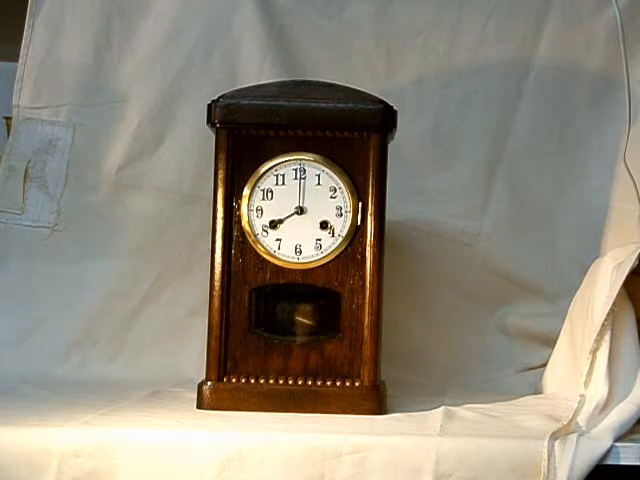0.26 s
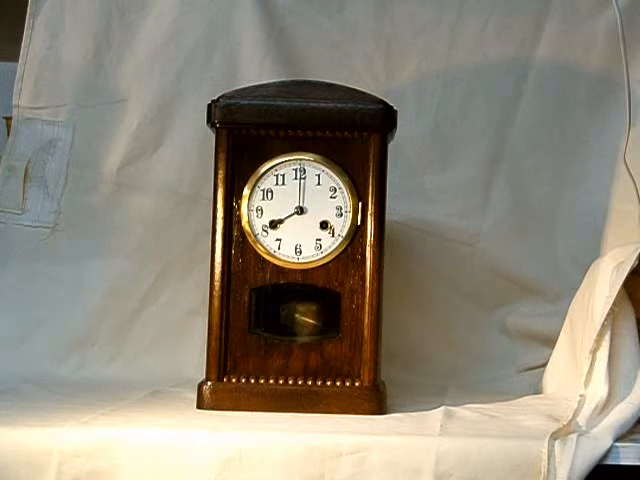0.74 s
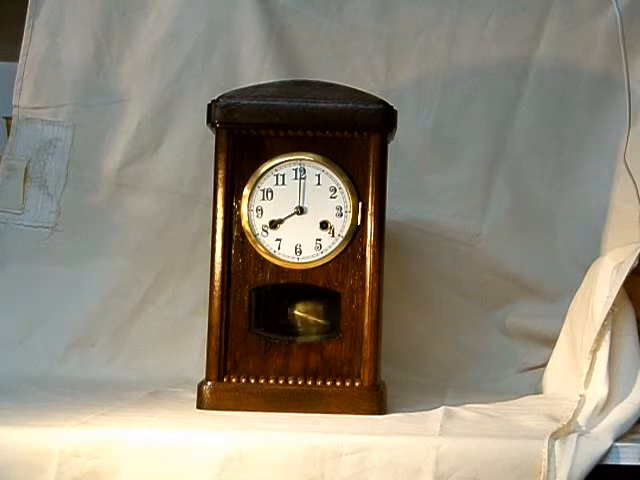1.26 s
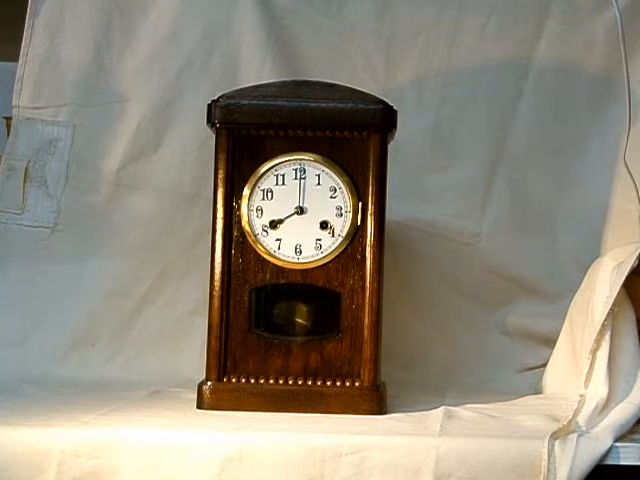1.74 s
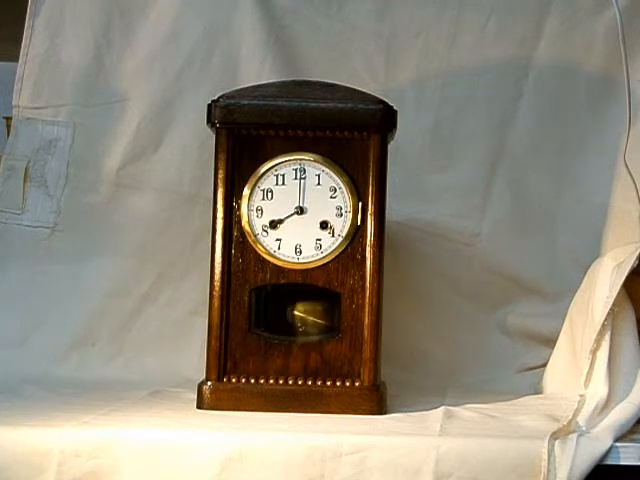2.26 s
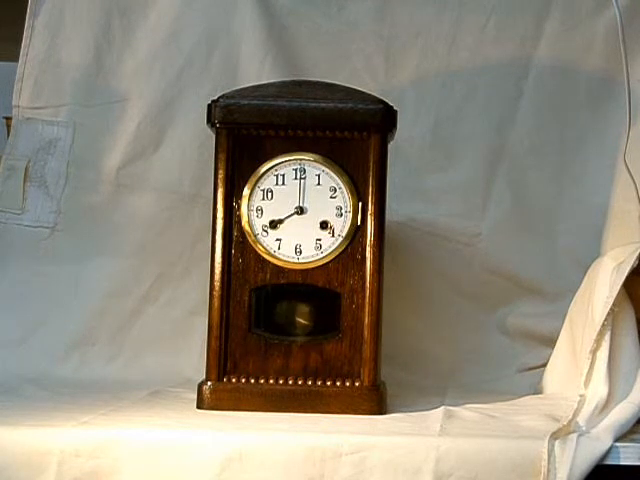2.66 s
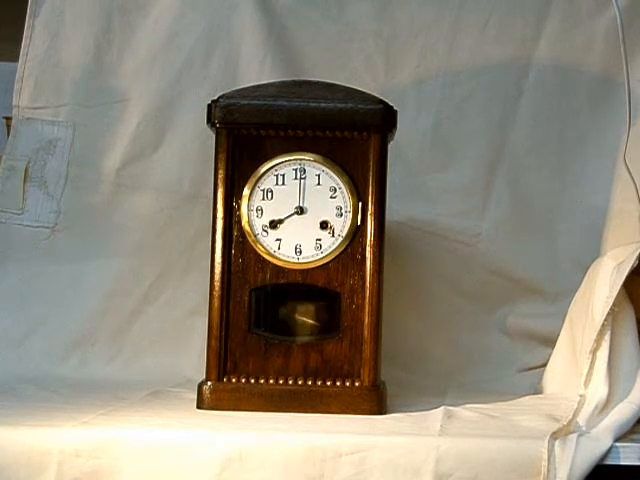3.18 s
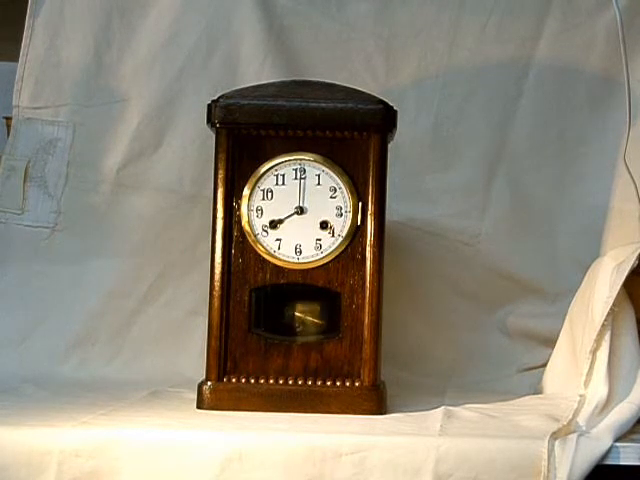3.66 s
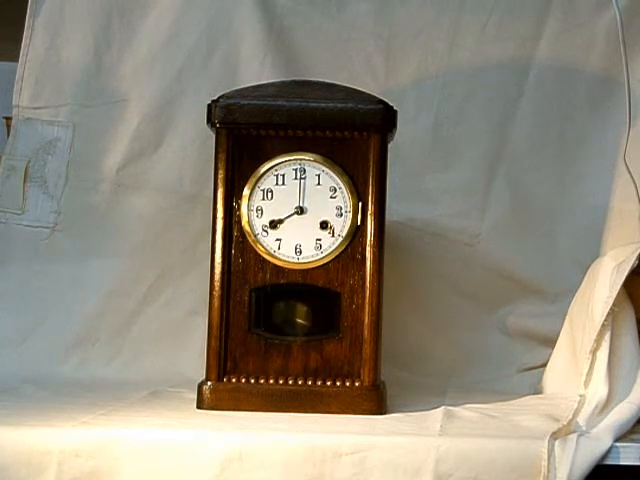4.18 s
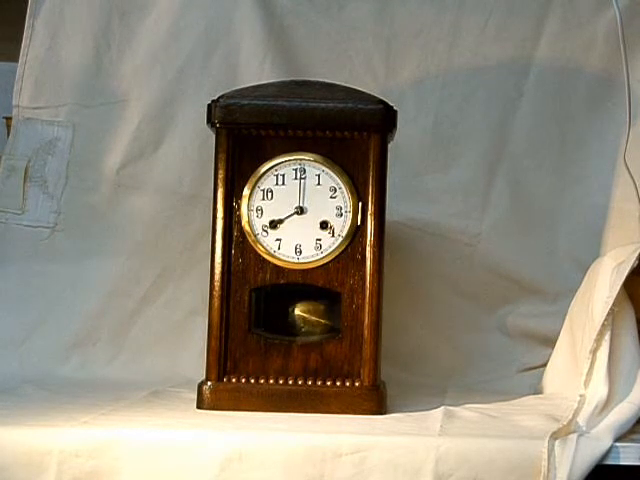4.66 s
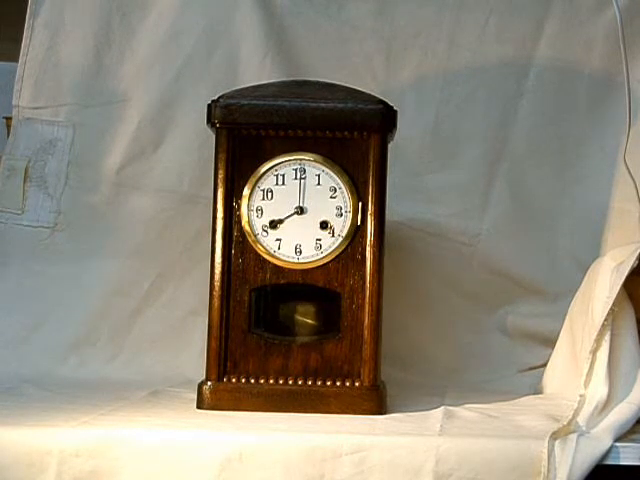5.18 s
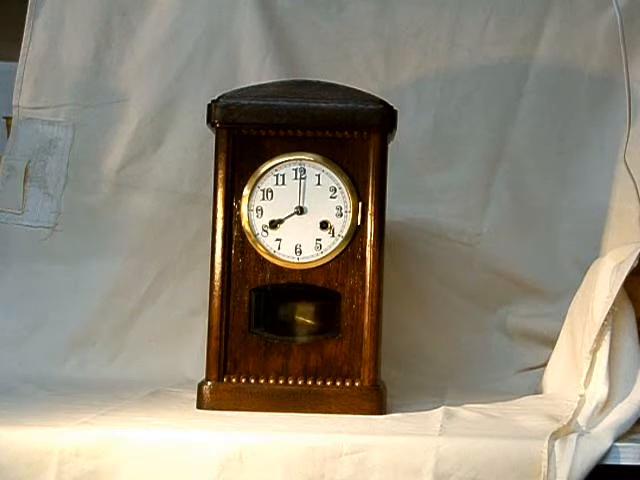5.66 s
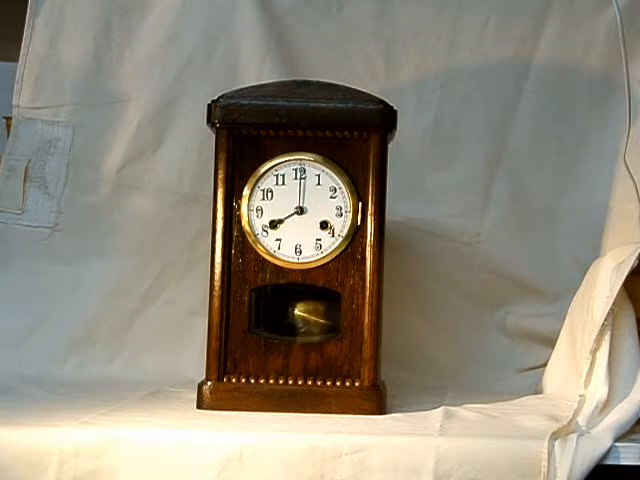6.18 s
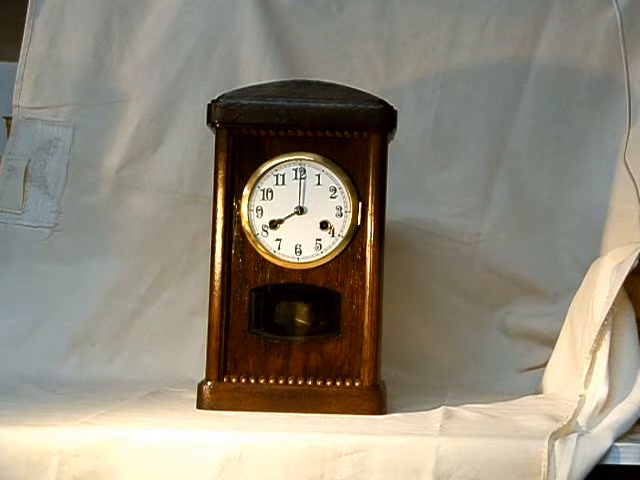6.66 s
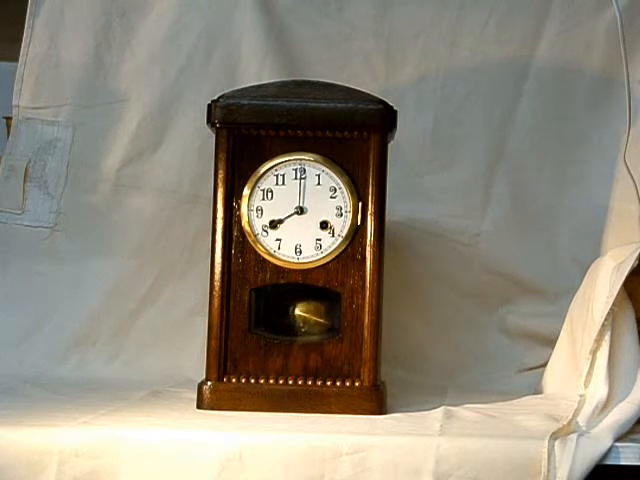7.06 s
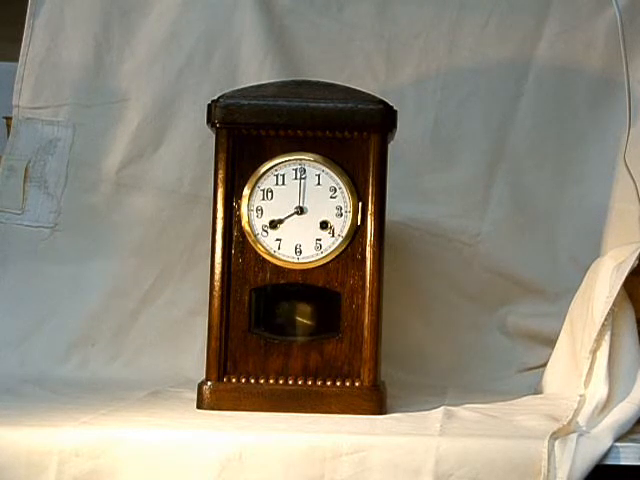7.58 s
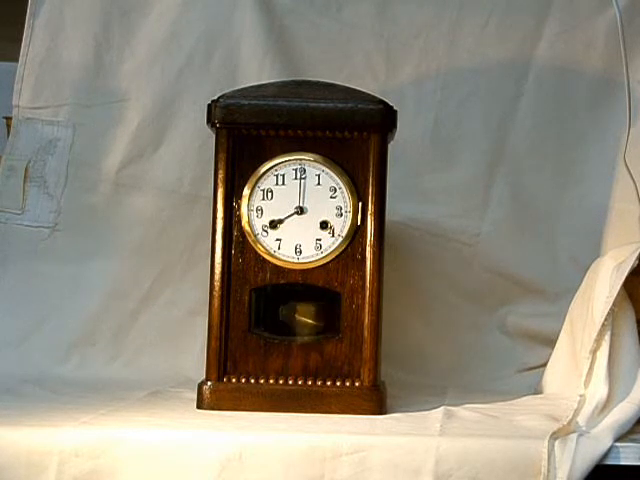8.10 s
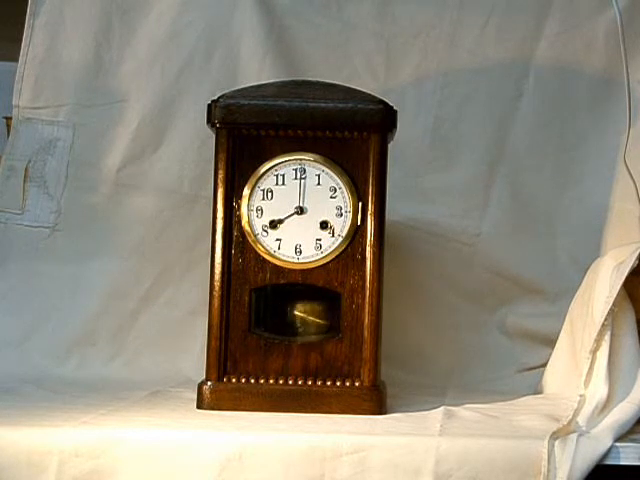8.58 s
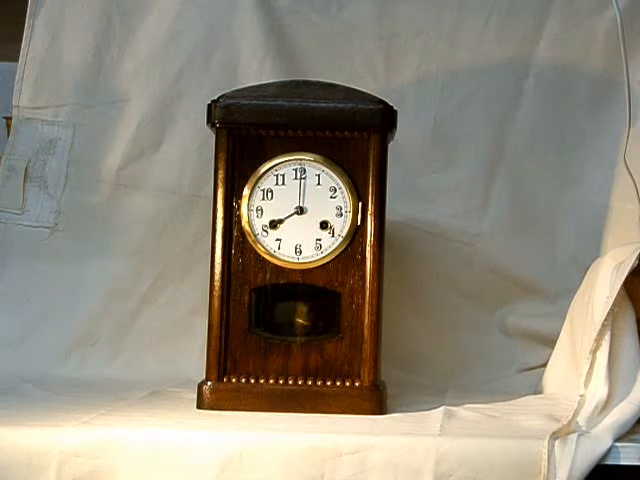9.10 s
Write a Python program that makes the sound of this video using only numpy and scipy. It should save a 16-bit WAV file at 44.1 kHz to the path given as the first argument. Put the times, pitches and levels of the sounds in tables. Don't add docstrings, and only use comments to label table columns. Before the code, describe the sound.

Five evenly spaced hammer blows on a clock's coiled gong, each with a woody knock and long metallic ring, end in a quick click.

```python
import sys
import numpy as np
from scipy import signal
from scipy.fft import rfft, irfft, next_fast_len
from scipy.io import wavfile
from scipy.ndimage import map_coordinates

SR = 44100
rng = np.random.default_rng(int(sys.argv[2]) if len(sys.argv) > 2 else 0)


def gain_from_decibels(decibels):
    exponent = np.asarray(decibels, float) / 20
    return 10 ** exponent


def wav_record(signal):
    frames = np.transpose(np.atleast_2d(signal))
    bounded = np.clip(frames, -1, 1)
    quanta = np.round(bounded * 32767).astype(np.int16)
    wavfile.write(sys.argv[1], SR, quanta)


N = 411894

# (pitch [Hz], level per Hz [dB])
HISS_COLOUR = [(40, -18), (120, -2), (250, 2), (600, -1), (2000, -4.5), (5000, -9.5), (8000, -11.5),
               (12000, -30.5)]
# (frame-rate steps from the middle tone [count], level [dB])
WHINE_TONES = [(-5, -72), (-1, -79.5), (-2, -80), (-1, -70.5), (0, -66), (1, -66.5), (2, -77)]
# (time [s], level [dB], hardness [dB per octave])
CLICKS = [
    (0.462, -12, 7),
    (8.436, 2, -1),
    (8.444, -5, 2),
    (8.454, -7.5, 2),
]
# (pitch [Hz], level [dB], time to fade by 60 dB [s])
CLOCKWORK = [(466, -43.5, 0.075), (768, -48.5, 0.099), (1370, -47, 0.045), (1920, -38.5, 0.035),
             (3270, -44, .03), (4340, -48, .025)]
BLOW_TIMES = [
    -3.586896,
    -2.065494,
    -.56611,
    .921988,
    2.419928,
    3.907498,
    5.424261,
    6.932408,
]
# (strength [dB], hardness [0 = usual], landing place along the wire [0 = usual])
BLOW_FORCES = [(-0.2, 0.29, 0.11), (-0.04, -1.53, -0.61), (0.43, -0.03, 1.52), (0.6, 1.41, 0.52),
               (0.07, -0.15, 0.2), (0.03, -0.67, -0.08), (0.16, 1.07, -0.76), (1.2, -0.39, -0.9)]
# (pitch [Hz], level [dB], time to fade by 60 dB [s], arrival [ms])
CASE_KNOCKS = [(153, -55, 0.12, 16), (324.8, -36, 0.077, 7.5), (559, -48, 0.081, 5.5),
               (741, -58.5, 0.22, 1.5), (814, -49, 0.29, 9.5), (973, -50.5, 0.093, 3),
               (1700, -39.5, 0.075, 4.5), (2505, -40, 0.045, -2.5), (3400, -50, .04, 3),
               (4300, -42.5, 0.021, 3)]
# (pitch [Hz], level [dB], time to fade by 60 dB [s], arrival [ms], swell [ms])
CASE_BOOMS = [(380.5, -23.3, .1, 5.96, 2.1), (807.8, -28.6, .127, 9.61, 7)]
COIL_PITCHES = [230.27, 389.95, 584.76, 816.2, 1081.14, 1373.42, 1694.89, 2041.16, 2418.78, 2824.84, 3019.5,
                3260.92, 3732.21, 4758.71]
# (level [dB], time to fade by 60 dB [s], swell [ms],
# gain from a hard blow [dB], gain from landing further out [dB])
COIL_RINGS = [(-41.5, 6.5, 38, 0.03, -0.53), (-28.1, 1.12, 3.2, -.8, 1.0), (-52.5, 21.7, 18, -0.6, 0.44),
              (-34, 5.2, 25, -1.5, .51), (-42, 13.6, 5, -3, -0.64), (-40.5, 9, 24, -0.66, -2.05),
              (-50.6, 12, 7, 2.5, 2), (-39, 8.5, 2.5, 1.6, -0.3), (-44, 6, 46, 0.04, -2.5),
              (-44.5, 6.9, 0.83, 1.9, 0.33), (-64.5, 5, 5.3, -1.8, .1), (-44.5, 4.4, 0.83, 1.5, -0.3),
              (-55.5, 5.5, 19, -0.2, -0.9), (-53.5, 3.8, 10, -0.8, -1)]
SHIMMER_PITCHES = [5320.7, 5906.3, 6518.71, 7160.5, 7818.5]
SHIMMER_LEVELS = [-62.5, -65.5, -54, -69, -61]
# (time to fade by 60 dB [s], swell [ms], gain from hard blow [dB], from landing out [dB])
SHIMMER_RING = (4.2, 4.9, 1.9, .1)


def hiss():
    hz, db = np.transpose(HISS_COLOUR)
    size = next_fast_len(N)
    bins_hz = np.arange(size // 2 + 1) * SR / size
    colour = gain_from_decibels(np.interp(np.log(bins_hz + 1), np.log(hz), db))
    noise = irfft(rfft(rng.standard_normal(size)) * colour, size)[:N]
    return noise * gain_from_decibels(-49.5) / np.std(noise)


def whine():
    middle_hz, frame_hz = 7842.5, 29.95
    t = np.arange(N) / SR
    out = np.zeros(N)
    for k, db in WHINE_TONES:
        hz = middle_hz + round(k) * frame_hz
        out += np.sqrt(2) * gain_from_decibels(db) * np.sin(2 * np.pi * (hz * t + rng.random()))
    return out


def treble_puffs():
    frame, grid, puffs_per_s = 1024, 986, 5.5
    out = np.zeros(N + 3 * frame)
    bins_hz = np.arange(frame + 1) * SR / (2 * frame)
    for when, where, use in rng.random((200, 3)):
        noise = rfft(rng.standard_normal(2 * frame))
        if use < puffs_per_s * N / SR / 200:
            low_hz = 4200 * 2.86 ** where
            puff = irfft(noise * (bins_hz > low_hz) * (bins_hz < 1.22 * low_hz))
            at = int(when * N) // frame * frame + grid
            out[at:at + 2 * frame] += np.hanning(2 * frame) ** 2 * puff * gain_from_decibels(-61) / np.std(puff)
    return out[:N]


def room(x, t60=0.51, wet_db=-13):
    t = np.arange(SR // 2) / SR
    fade = np.exp(-np.log(1000) * t / t60) * (1 - np.exp(-t / 0.008))
    tail = rng.standard_normal(len(t)) * fade
    return x + gain_from_decibels(wet_db) * signal.fftconvolve(x, tail / np.sqrt(np.sum(tail ** 2)))[:N]


def ring(hz, t60, swell, times, sizes):
    out = 0
    at = np.clip(np.ceil(times * SR), 0, N - 2).astype(int)
    for sign, fade in ((1, 0.0078), (-1.1, 1 / swell)):
        pole = 2j * np.pi * hz - np.log(1000) / t60 - fade
        turn = np.exp(pole / SR)
        start = sign * sizes * np.exp(pole * (at / SR - times))
        push = np.zeros(N)
        np.add.at(push, at, start.imag)
        np.add.at(push, at + 1, -(start * turn.conjugate()).imag)
        out = out + signal.lfilter([1], [1, -2 * turn.real, abs(turn) ** 2], push)
    return out


def tilt(hz, level_db, hard_db):
    return gain_from_decibels(level_db + hard_db * np.log2(max(hz, 500.) / 1000))


def force(db, hard_db, aim_db):
    level_db, hard, aim = np.transpose(BLOW_FORCES)
    return gain_from_decibels(db + level_db + hard_db * hard + aim_db * aim)


def clockwork():
    click_s, level_db, hard_db = np.transpose(CLICKS)
    return sum(ring(hz, t60, 0.0012, click_s, tilt(hz, db + level_db, hard_db)) for hz, db, t60 in CLOCKWORK)


def hammer_scrape():
    rise_s, t60_s, band_hz = 0.005, 0.16, (1210, 3380)
    t = np.arange(N) / SR
    shape = 0
    for at, (level_db, hard, _) in zip(BLOW_TIMES, BLOW_FORCES):
        rise = np.clip((t - at) / rise_s, 0, 1)
        shape = shape + rise * gain_from_decibels(level_db + 1.5 * hard - 60 * np.abs(t - at) / t60_s)
    band = signal.butter(2, band_hz, "bandpass", fs=SR, output="sos")
    grit = signal.sosfilt(band, rng.standard_normal(N))
    return shape * grit * gain_from_decibels(-43.5) / np.std(grit)


def case_knock():
    level_db, hard, _ = np.transpose(BLOW_FORCES)
    out = 0
    for hz, db, t60, late_ms in CASE_KNOCKS:
        times = np.array(BLOW_TIMES) + late_ms / 1000
        out = out + ring(hz, t60, 0.0012, times, tilt(hz, db + level_db, 1.0 * hard))
    return out


def case_boom():
    out = 0
    for (hz, db, t60, late_ms, swell_ms), overtone in zip(CASE_BOOMS, COIL_RINGS[1:4:2]):
        times = np.array(BLOW_TIMES) + late_ms / 1000
        out = out + ring(hz, t60, swell_ms / 1000, times, force(db, *overtone[3:]))
    return out


def gong():
    pitches = COIL_PITCHES + SHIMMER_PITCHES
    rings = COIL_RINGS + [(db, *SHIMMER_RING) for db in SHIMMER_LEVELS]
    out = 0
    for hz, (db, t60, swell_ms, *gains) in zip(pitches, rings):
        late_ms = 10.05 * np.sqrt(389.6 / hz) - 3
        times = np.array(BLOW_TIMES) + late_ms / 1000
        out = out + ring(hz, t60, swell_ms / 1000, times, force(db, *gains))
    return out


def scene():
    in_room = room(case_knock() + clockwork() + hammer_scrape())
    mono = gong() + case_boom() + in_room + hiss() + whine()
    return np.array([mono, mono])


def band_limit(x):
    return signal.sosfilt(signal.butter(12, 15700, fs=SR, output="sos"), x)


def record(dry):
    camera_hz, block, steps, offset = 16000, 4000, 128, 2
    span = block * SR // camera_hz - 1
    taken = np.arange((N // span + 1) * block) * span / block
    samples = map_coordinates(dry[0], [taken], order=3, mode="nearest")
    samples = (np.round(samples * steps) + offset) / steps
    n = np.arange(N)
    held = samples[n // span * block + n % span * camera_hz // SR]
    held = signal.sosfiltfilt(signal.ellip(10, .1, 50, 15440, fs=SR, output="sos"), held)
    side = treble_puffs()
    mix = np.array([held + side, held - side])
    return band_limit(mix)


dry = scene()
out = record(dry)
wav_record(out)
```